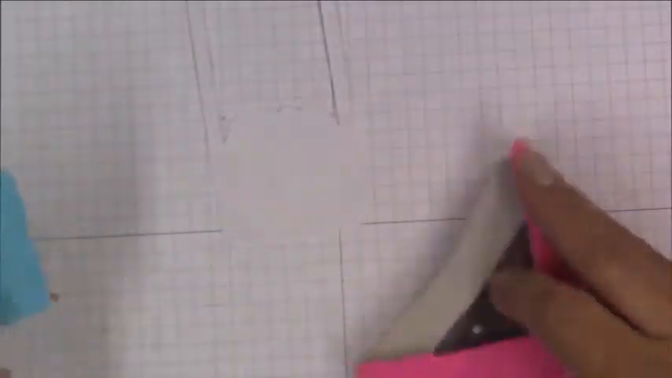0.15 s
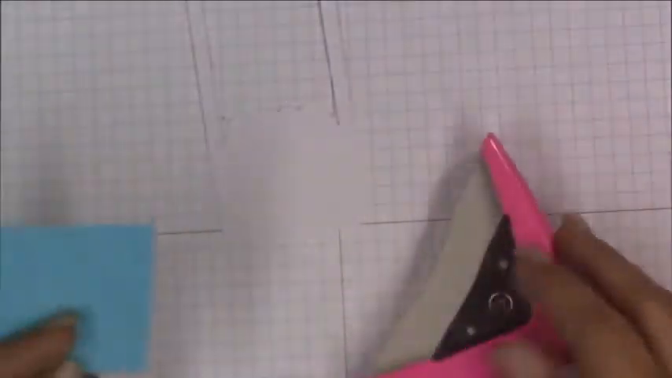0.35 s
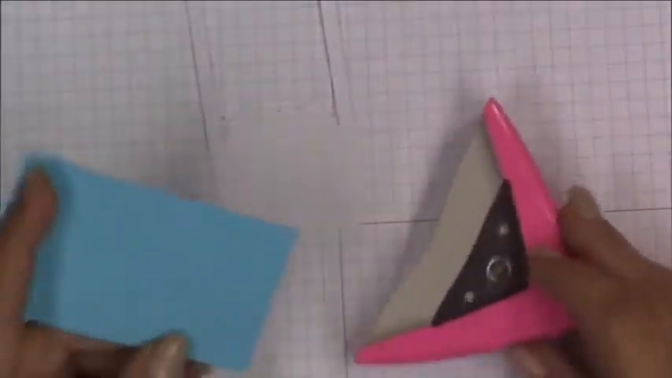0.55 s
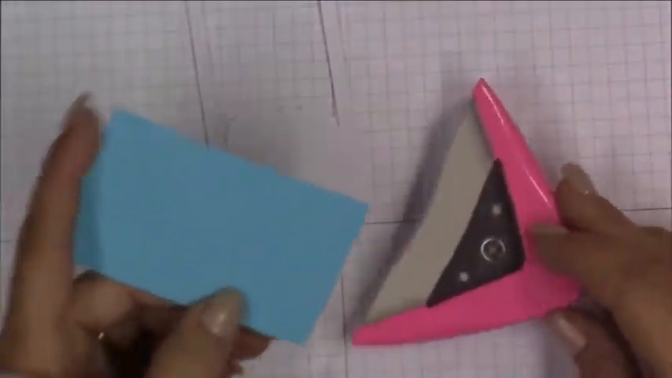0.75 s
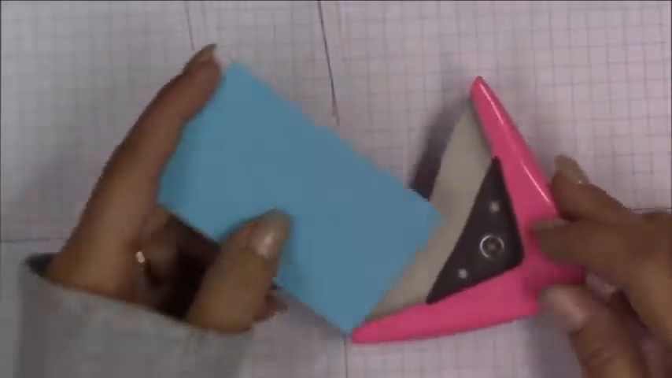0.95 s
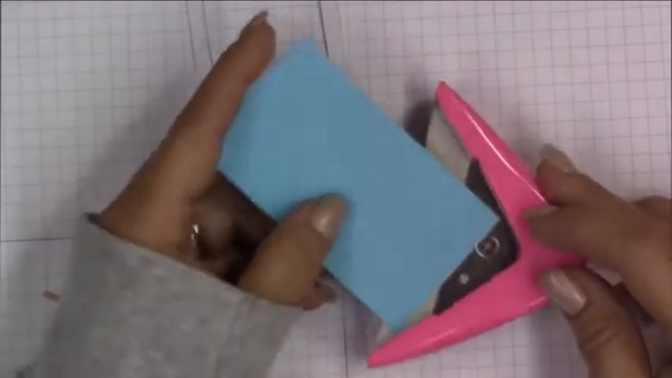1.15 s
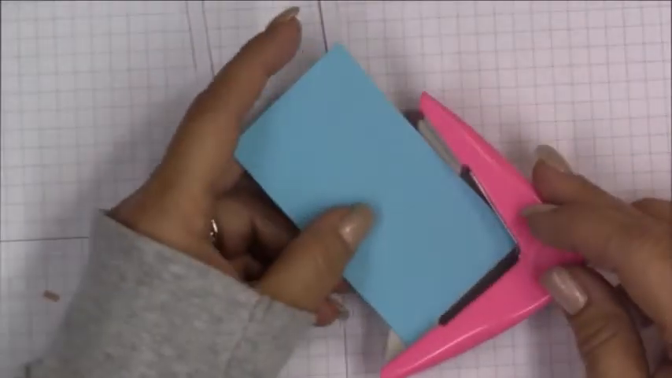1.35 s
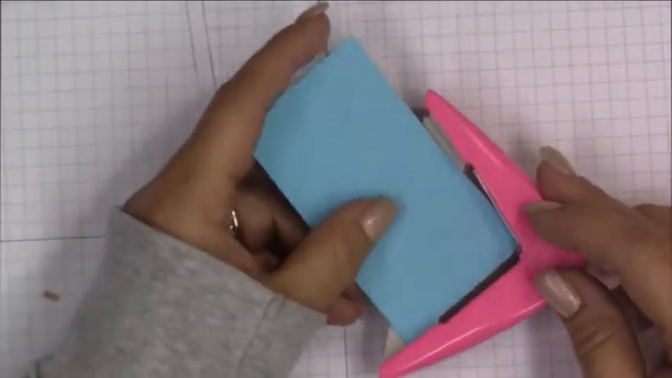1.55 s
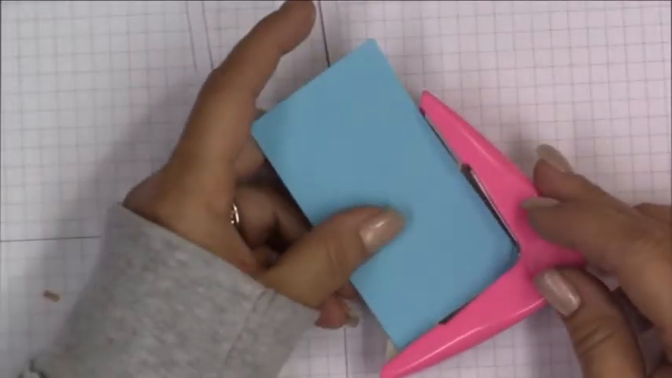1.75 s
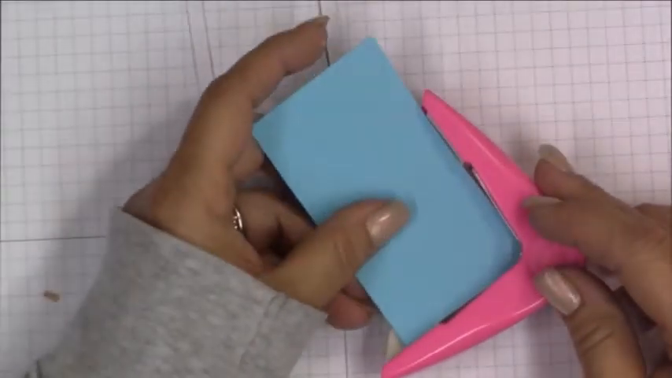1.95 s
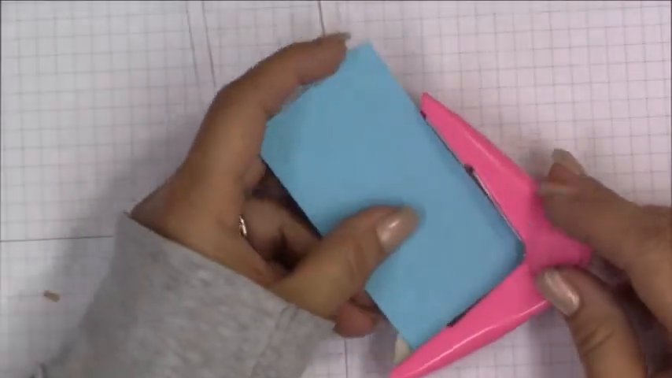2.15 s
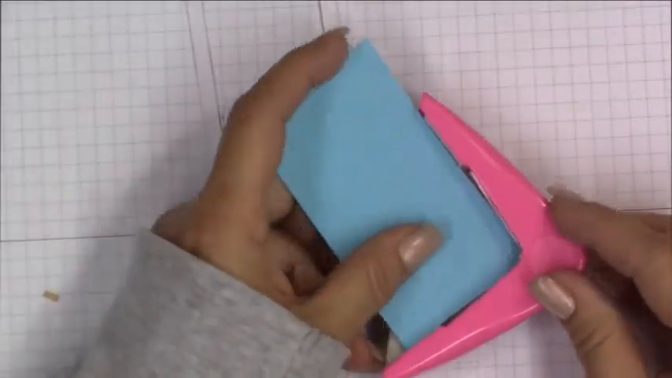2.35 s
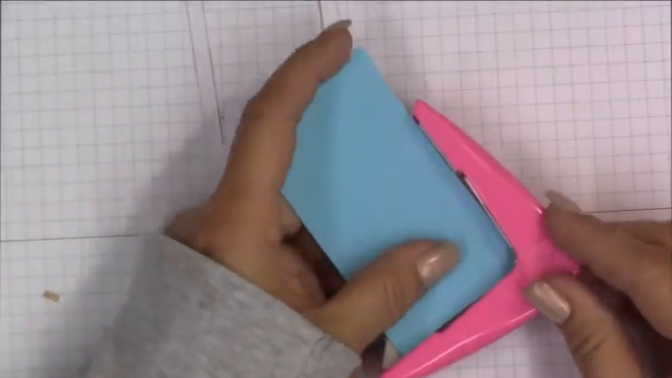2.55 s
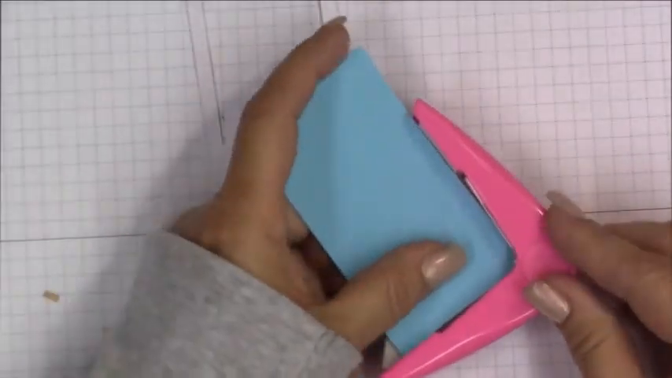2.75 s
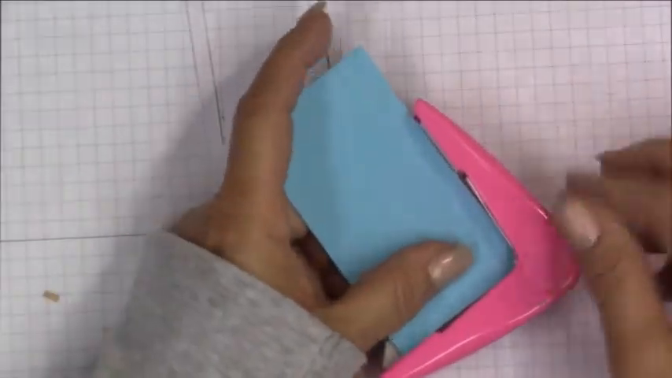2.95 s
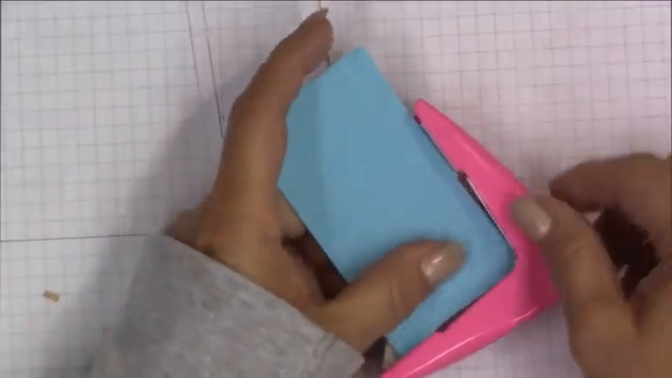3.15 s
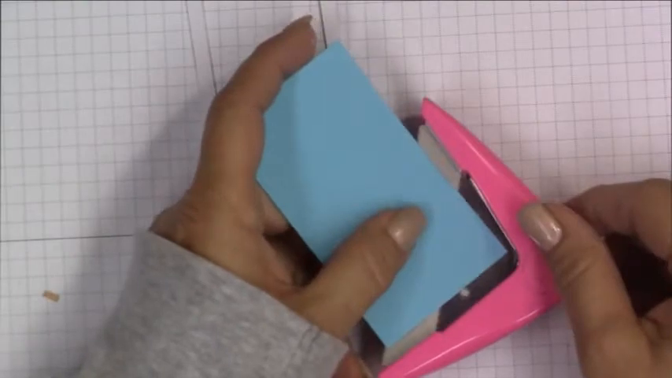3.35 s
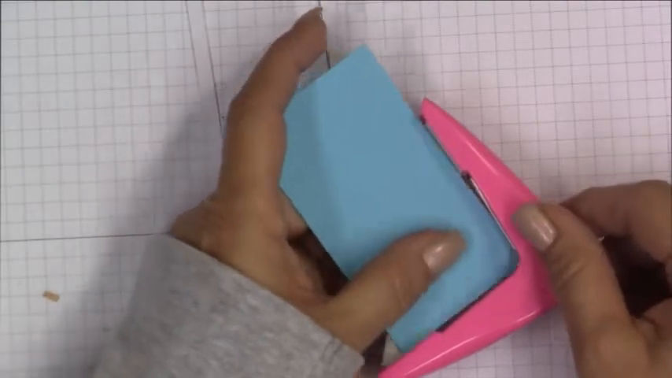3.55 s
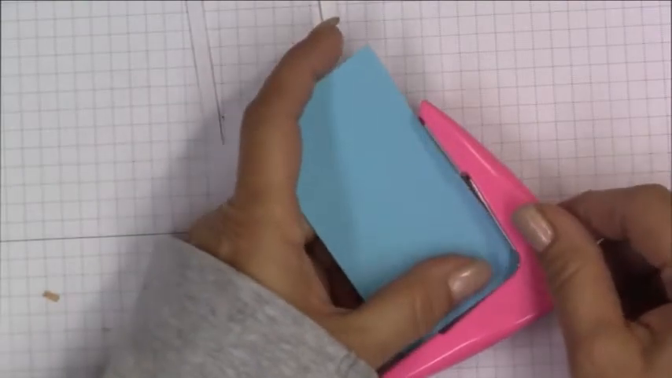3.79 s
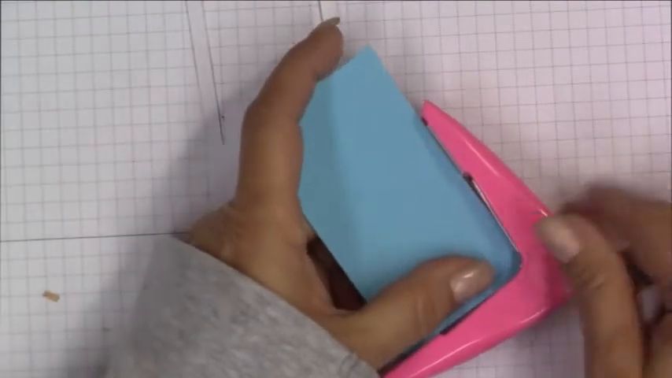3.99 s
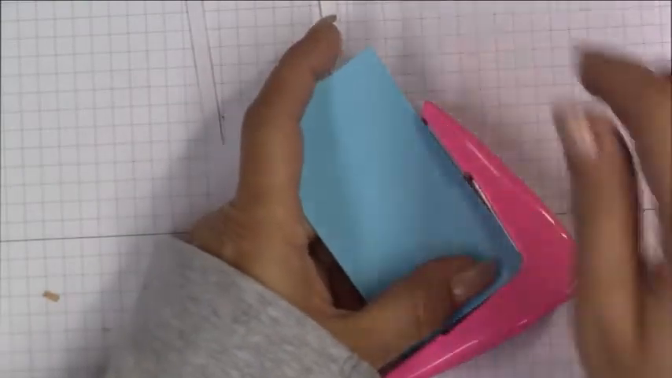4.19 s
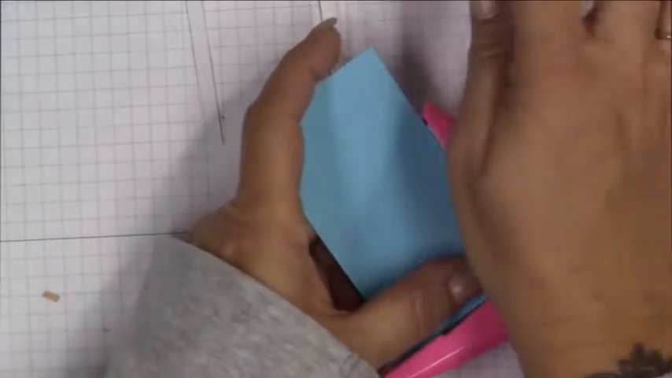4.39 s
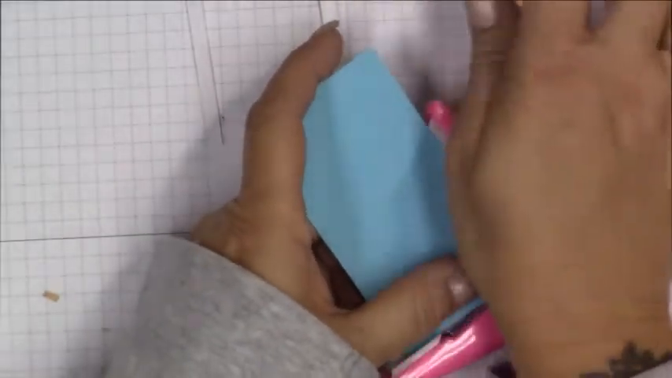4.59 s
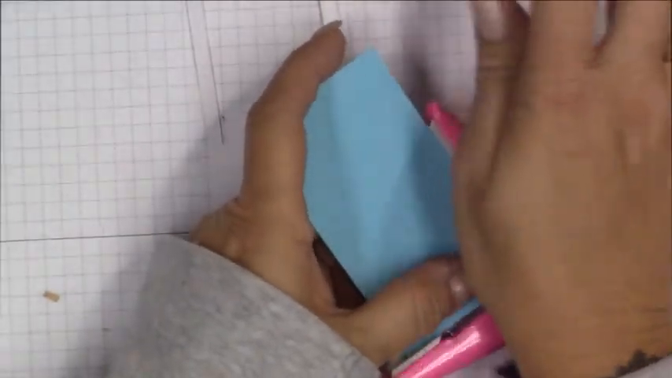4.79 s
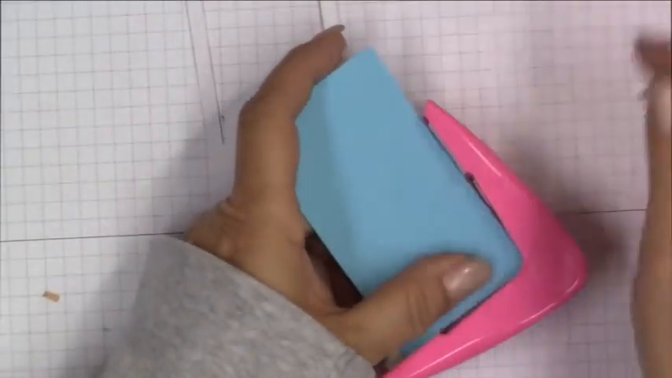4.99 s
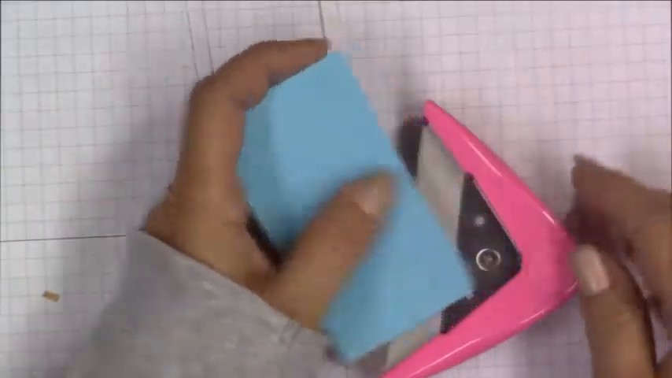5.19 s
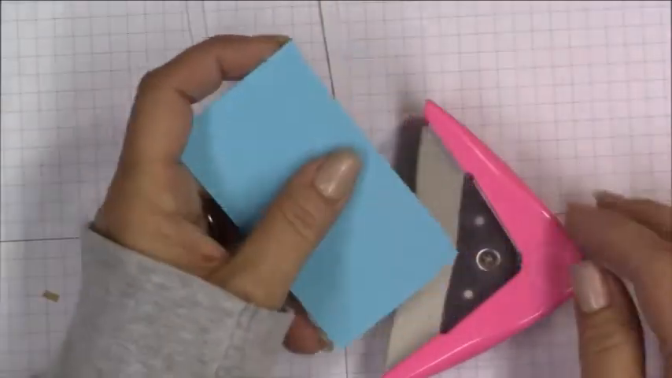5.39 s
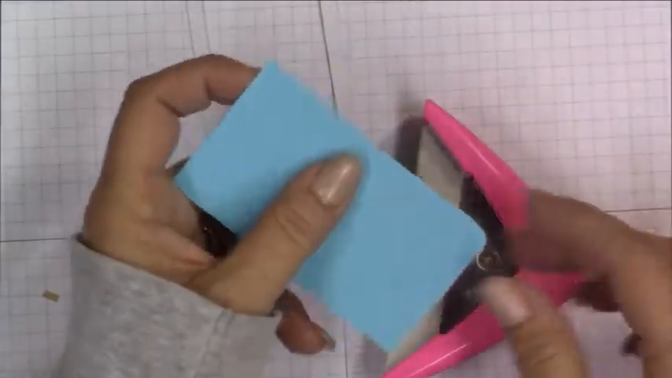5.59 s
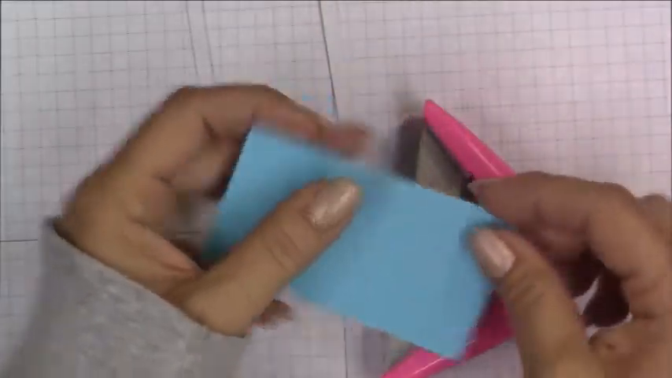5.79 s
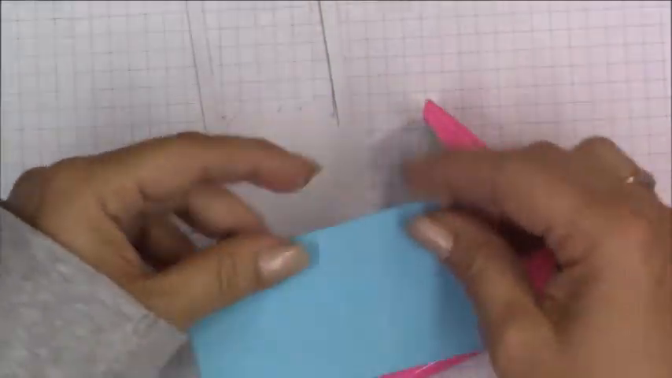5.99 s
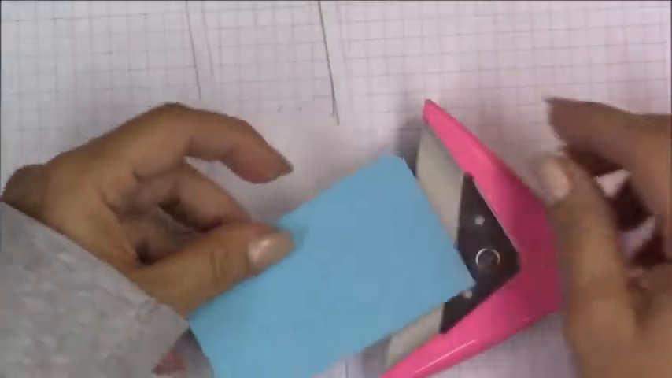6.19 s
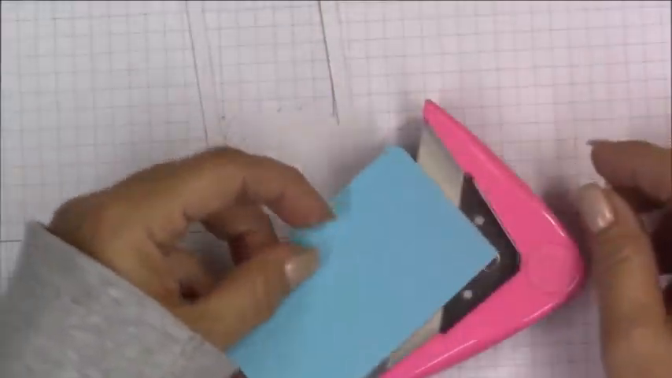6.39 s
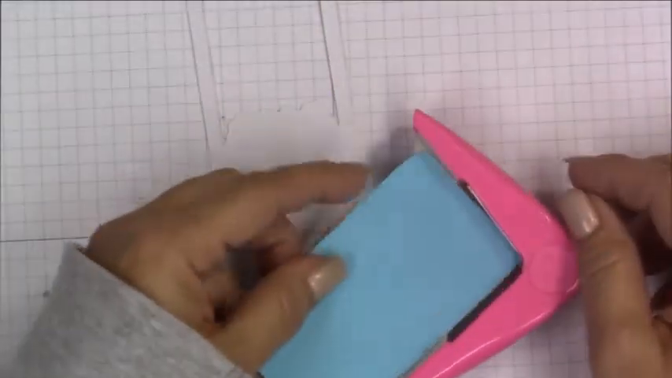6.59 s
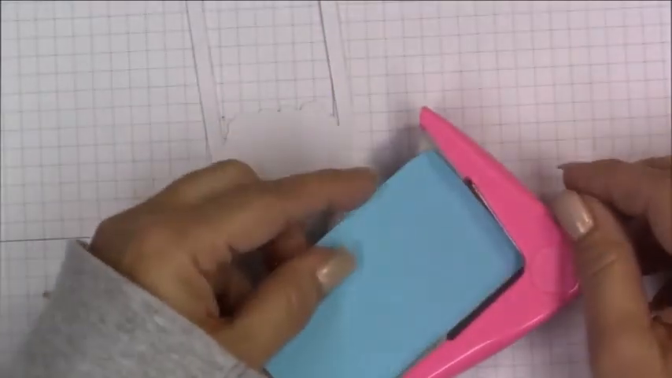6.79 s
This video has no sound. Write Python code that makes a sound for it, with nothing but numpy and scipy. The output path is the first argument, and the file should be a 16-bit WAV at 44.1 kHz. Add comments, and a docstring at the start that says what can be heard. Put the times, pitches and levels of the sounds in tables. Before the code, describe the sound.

A plastic corner punch is set down on a desk with a few light knocks. A piece of card rubs and ticks softly into its guides, and the loose lever gives a small double click. Then the punch snaps through with one loud, crunchy clack and a hollow thump. Two lighter clicks follow as the lever springs back, and the card slides out. The sound is close, in a small quiet room with faint hum.

```python
"""Corner punch on a craft desk

A plastic punch is set down close by in a small room, and a card rubs and ticks into its guides.
A palm presses the lever until the die snaps through with one loud clack: the shell rings, loose
parts chatter, the hollow base booms and knocks on the desk. The lever springs back and the card
is drawn out and turned, over soft room air and mains hum."""
import sys
import numpy as np
from scipy import signal
from scipy.fft import rfft, irfft, next_fast_len
from scipy.io import wavfile
from scipy.ndimage import uniform_filter1d

SR = 44100
rng = np.random.default_rng(int(sys.argv[2]) if len(sys.argv) > 2 else 0)


def unload_audio(sound):
    """Save the sound as a 16-bit wav file, at the path given as the first command line argument."""
    columns = np.transpose(np.atleast_2d(sound))
    # keep every value between -1 and 1, then stretch to whole-number steps
    steps = np.round(np.clip(columns, -1, 1) * 32767)
    wavfile.write(sys.argv[1], SR, steps.astype(np.int16))


N = 301465
T = np.arange(N) / SR


def undb(db):
    """Decibels to gain."""
    return 10 ** (np.asarray(db) / 20)


def unit(x):
    """Scale to rms 1."""
    return x / np.sqrt(np.mean(x ** 2))


def gain_at(hz, curve):
    """Gain of an EQ curve (f/Hz, level/dB), in straight lines on a log axis."""
    f, db = np.transpose(curve)
    return undb(np.interp(np.log(np.maximum(hz, 1)), np.log(f), db))


def eq(x, curve):
    """Filter through an EQ curve."""
    size = next_fast_len(len(x))
    gains = gain_at(np.fft.rfftfreq(size, 1 / SR), curve)
    return irfft(rfft(x, size) * gains, size)[:len(x)]


def noise(n, curve):
    """Noise coloured by an EQ curve; rms 1."""
    return unit(eq(rng.standard_normal(n), curve))


def wander(rate_hz):
    """Smooth random modulation; rms 1."""
    step = int(SR / rate_hz)
    stairs = np.repeat(rng.standard_normal(N // step + 1), step)
    return unit(uniform_filter1d(stairs, step)[:N])


def crackle(per_s):
    """Tiny clicks at random moments, uneven in size; rms 1."""
    return unit((rng.random(N) < per_s / SR) * rng.standard_normal(N))


def fade(t, t60):
    """Decay by 60 dB in t60 seconds."""
    return np.exp(-np.log(1000) * t / t60)


def attack(t, rise_s):
    """S-shaped fade-in."""
    return 1 - np.exp(-(t / rise_s) ** 2)


def ring(modes, gains, t):
    """Struck modes (f/Hz, level/dB, t60/s), each with its own gain."""
    return sum(gain * undb(db) * np.sin(2 * np.pi * hz * t) * fade(t, t60)
               for (hz, db, t60), gain in zip(modes, gains))


def add(out, s, sound):
    """Mix a sound in at s seconds."""
    i = int(s * SR)
    out[i:i + len(sound)] += sound[:N - i]


def stereo(mid, side):
    """Mid and side to left and right."""
    return np.array([mid + side, mid - side])


# Tone of the room air and microphone hiss: f/Hz, level/dB
AIR_TONE = [(15, -12), (30, -9.5), (60, -10), (100, -2.5), (160, -2.5), (260, -1), (400, 0.5), (540, -3.5),
            (1100, -9), (1500, -8), (2300, -15), (7000, -21.5), (11000, -27.5), (15500, -32.5)]
# Stereo width of the air: f/Hz, side re mid/dB
AIR_WIDTH = [(60, -8), (110, -9.5), (200, -7), (700, -5), (1300, -6.5), (2400, -2.5), (4400, -6.5),
             (8000, -12), (15000, -29)]


def room_tone(air_db=-60.5, hum_hz=119.4, hum_db=-68.5):
    """The bed: steady room air with a faint mains hum in the centre."""
    mid, side = noise(N, AIR_TONE), noise(N, AIR_TONE)
    hum = unit(np.sin(2 * np.pi * hum_hz * T + .7 * wander(5)))
    return undb(air_db) * stereo(mid, eq(side, AIR_WIDTH)) + undb(hum_db) * hum


# Tone of the wall reflections: f/Hz, level/dB
WALL_TONE = [(80, -3.5), (200, 2.5), (400, 1.5), (550, 2), (1000, 3), (1500, -0.5), (2700, -4.5),
             (4500, -1), (7000, -4), (15000, 0.5)]
# Stereo width of the reflections: f/Hz, side re mid/dB
WALL_WIDTH = [(40, -5.5), (120, -18), (500, -26), (2300, -18), (4500, -10.5), (8000, -15), (12000, -24.5)]


def room(x, wet_db, early_t60=0.2, late_db=-22, late_t60=0.5):
    """Near walls and shelves answer at once and a weak tail lingers, in a narrow stereo image."""
    t = T[:SR // 2]
    envelope = (fade(t, early_t60) + undb(late_db) * fade(t, late_t60)) * attack(t, 0.0017)
    envelope *= undb(wet_db) / np.linalg.norm(envelope)
    mid, side = (signal.fftconvolve(x, noise(len(t), WALL_TONE) * envelope)[:N] for _ in range(2))
    return stereo(x + mid, eq(side, WALL_WIDTH))


# Envelope of the punch's foot skidding over the mat: t/s, level/dB
SKID_ENVELOPE = [(0, -58), (.09, -61.5), (.15, -64), (.25, -66.5), (.33, -62), (.38, -85)]
# Tone of the skid: f/Hz, level/dB
SKID_TONE = [(60, -26), (200, -5), (800, -3), (1050, -7), (1200, 0), (1400, -11), (4000, -25), (10800, -21),
             (11700, -10), (12500, -24.5), (15000, -37.5)]


def foot_skid():
    """The punch is swung into place: a low scrub with a thin whistling hiss."""
    level_db = np.interp(T, *np.transpose(SKID_ENVELOPE), right=-120)
    return undb(level_db) * noise(N, SKID_TONE)


def card_friction(tone, slip_db, slips_per_s, peaks_db=3.0, shift_hz=9):
    """Brushing fibres and tiny slips, through card resonances that change as the fingers shift."""
    hz = np.geomspace(800, 15000, 70)
    crossfades = np.array([wander(shift_hz) for _ in range(3)])
    crossfades /= np.linalg.norm(crossfades, axis=0)  # constant power
    out = np.zeros(N)
    for crossfade in crossfades:
        resonances = np.column_stack([hz, peaks_db * rng.standard_normal(len(hz))])
        friction = rng.standard_normal(N) + undb(slip_db) * crackle(slips_per_s)
        out += crossfade * eq(friction, resonances)
    return unit(eq(out, tone))


# Fingers shifting the card between strokes: t/s, rub level/dB
TOUCH_ENVELOPE = [(0, -60.5), (.4, -72.5), (.8, -63.5), (1.55, -71), (1.95, -71), (2.65, -65), (3.1, -66.5),
                  (3.7, -78), (3.95, -78.5), (4.9, -75.5), (5.5, -66), (6.8, -70.5)]
# Card strokes over mat, guides and die: fastest moment t/s, rise/s, rub level/dB, hiss level/dB
CARD_STROKES = [(0.215, 0.019, -52.5, -55.5), (0.475, 0.028, -67, -61), (0.6, 0.082, -62, -52.5),
                (0.727, 0.017, -56.5, -59), (0.881, 0.016, -58, -50), (1.05, 0.05, -61, -60.5),
                (1.17, 0.049, -61, -62), (1.44, 0.021, -62.5, -67.5), (1.555, 0.046, -62, -72),
                (1.726, 0.016, -52.5, -60), (1.799, 0.0071, -56, -67), (1.818, 0.025, -54, -71),
                (2.14, 0.0097, -60, -77), (2.27, 0.02, -54.5, -71), (2.348, 0.057, -57, -60.5),
                (3.31, 0.046, -63, -63.5), (3.537, 0.027, -52.5, -60), (3.65, 0.032, -62, -66),
                (3.762, 0.023, -65, -64.5), (3.811, 0.026, -53, -71), (4.02, 0.01, -62, -63.5),
                (4.11, 0.053, -58, -63.5), (4.892, 0.0067, -44.5, -59), (5.295, 0.092, -64, -64.5),
                (5.66, 0.013, -62, -64), (5.81, 0.019, -53, -68), (5.925, 0.089, -64, -61),
                (6.113, 0.011, -61, -57), (6.41, 0.032, -67, -63.5)]
# Body of pressed card rubbing: f/Hz, level/dB
RUB_TONE = [(200, -10.5), (600, -7.5), (1100, -5.5), (1500, 3), (1850, -1.5), (2250, 3.5), (2750, -3),
            (3300, -5.5), (5000, -11), (9000, -24.5), (15000, -41)]
# Airy top of lightly brushed card: f/Hz, level/dB
HISS_TONE = [(1500, -22), (3000, 0), (5000, -2), (7000, -3), (10000, -3), (13000, -12.5), (16000, -19.5)]


def card_slides(trim_db=-1, touch_hiss_db=-5, fidget_db=1.4, grip_db=2.0, stop_share=0.52):
    """Fibres brush and the edge slips in gritty jerks; pressed card has body, a light touch hisses."""
    touch = undb(np.interp(T, *np.transpose(TOUCH_ENVELOPE)) + fidget_db * wander(10))
    rub_power, hiss_power = touch ** 2, (touch * undb(touch_hiss_db)) ** 2
    for s, rise_s, rub_db, hiss_db in CARD_STROKES:
        near = np.abs(T - s) < 3 * rise_s
        t = T[near] - s
        width_s = np.where(t < 0, rise_s, stop_share * rise_s)  # the hand speeds up, then stops sooner
        speed = np.exp(-(t / width_s) ** 2 / 2)
        rub_power[near] += (speed * undb(rub_db)) ** 2
        hiss_power[near] += (speed * undb(hiss_db)) ** 2
    grip = undb(grip_db * wander(90))
    rub = np.sqrt(rub_power) * card_friction(RUB_TONE, slip_db=-1, slips_per_s=1200)
    hiss = np.sqrt(hiss_power) * card_friction(HISS_TONE, slip_db=-3, slips_per_s=900)
    return undb(trim_db) * grip * (rub + hiss)


def edge_catches(per_s=2.6, db=-59, spread_db=5, hz=3200, spread_octaves=1.5, ring_db=-4):
    """Cues for light catches of the card's edge, scattered in time, level and pitch."""
    gaps, levels, pitches = rng.random((64, 3)).T
    times = np.cumsum(-np.log(1 - gaps)) / per_s
    return [(s, db + spread_db * (level - .5), hz * 2 ** (spread_octaves * (pitch - .5)), ring_db)
            for s, level, pitch in zip(times, levels, pitches) if s < T[-1]]


# Small dry ticks and taps: card edge catching, lever clicking, punch base knocking as it settles.
# t/s, level/dB, centre f/Hz, ring re snap/dB
SMALL_TICKS = [(0.074, -53, 5000, -5), (0.1125, -42, 8400, -9), (0.111, -39, 4660, -4),
               (0.333, -49, 3200, -8), (0.485, -43.5, 3500, -10), (0.486, -44, 6500, 3),
               (0.547, -41, 4060, -3), (0.635, -45, 2950, 0), (0.636, -49, 8000, -13),
               (0.871, -44.5, 1490, -2), (0.878, -47.5, 3640, -9), (1.118, -50, 1510, -7),
               (1.143, -46, 2400, 2), (1.7132, -44.5, 1960, -4), (1.7133, -47, 7100, -8),
               (1.739, -49, 1750, 8), (1.925, -48, 4350, -9), (2.435, -40.5, 4770, 4),
               (2.776, -41, 1470, -6), (2.7758, -50, 7500, -6), (2.8378, -40.5, 4900, -10),
               (2.734, -51, 2290, -6), (2.97, -55.5, 2600, -6), (3.854, -50, 1470, -5),
               (4.042, -52, 1400, -7), (4.153, -49.5, 2500, -8), (5.1479, -41, 570, -7),
               (5.1499, -45, 900, -2), (6.116, -57, 3530, -10), (6.6465, -47.5, 2780, -8.5)]


def small_ticks(snap_t60=0.017, ring_t60=0.01):
    """Light, well damped contacts: a short dry snap round one broad resonance, with a brief ping."""
    out, t = np.zeros(N), T[:SR // 10]
    for s, db, hz, ring_db in SMALL_TICKS + edge_catches():
        tone = [(hz / 3, -22), (hz * 0.99, 0), (hz, 0), (hz * 1.7, -14), (hz * 3.5, -28), (hz * 8, -42)]
        snap = noise(len(t), tone) * fade(t, snap_t60)
        ping = ring([(hz, ring_db, ring_t60)], [1], t)
        add(out, s, undb(db) * (snap + ping))
    return out


# The base knocks on the desk: t/s, level/dB, bass tilt/(dB per octave down), second landing/dB
DESK_KNOCKS = [(0.1102, -45, 4.5, 2.5), (0.2366, -41, -5, -3), (0.2745, -50.5, 7.5, -11),
               (1.819, -51.5, 3.5, -14), (2.776, -45, -2, -4), (2.8740, -50.5, 4.5, -11),
               (4.582, -48, 8, 0), (4.6383, -28, 4.5, -5.5), (4.732, -51, 7, 1), (4.884, -45, 6.5, 2),
               (5.1475, -49, -3, -12)]
# Modes of the desk top: f/Hz, level/dB, t60/s
DESK_MODES = [(88.4, -21, 0.08), (134, -16.5, 0.043), (172, -8.5, 0.11), (193, -7.5, 0.15), (285, -8, 0.06),
              (322, 0, 0.07), (368, -3.5, 0.069), (400, -3.5, .06), (445.8, -13, 0.06), (705, -16, 0.019),
              (932, -19, 0.02)]


def desk_knocks(push_s=0.0019, rock_s=.0223, rock_tilt_db=-3.5):
    """The base thuds through the mat into the desk top, rocks and lands again with less bass."""
    out, t = np.zeros(N), T[:SR // 4]
    octaves_down = np.log2(400 / np.array(DESK_MODES)[:, 0])
    cushion = 1 - np.exp(-t / push_s)
    for s, db, tilt_db, second_db in DESK_KNOCKS:
        first = ring(DESK_MODES, undb(tilt_db * octaves_down), t)
        second = ring(DESK_MODES, undb((tilt_db + rock_tilt_db) * octaves_down), t)
        add(out, s, undb(db) * first * cushion)
        add(out, s + rock_s, undb(db + second_db) * second * cushion)
    return out


# The lever is nudged and let go: t/s, level/dB, low modes/dB, high modes/dB
LEVER_CLICKS = [(2.7743, -31.5, -0.5, -31), (2.8374, -33.5, -17, 0)]
# Modes of the lever: f/Hz, level/dB, t60/s
LEVER_MODES = [(900, -4.5, .03), (1480, 0, 0.026), (2190, 1.5, 0.023), (2350, -1.5, 0.017),
               (2680, -13, 0.013), (3960, 2, 0.018), (4660, -6, .016), (6200, -13, 0.011), (8300, -7, .009),
               (10500, -8, 0.0092)]


def lever_clicks(contact_s=0.0004, bounce_s=0.0096, bounce_db=-13):
    """The loose lever taps its hinge and bounces once: dark when nudged, bright when it flicks back."""
    out, t = np.zeros(N), T[:SR // 8]
    for s, db, low_db, high_db in LEVER_CLICKS:
        tone = [(1500, low_db), (2100, 0), (2700, 0), (3900, high_db)]
        gains = gain_at(np.array(LEVER_MODES)[:, 0], tone)
        click = undb(db) * ring(LEVER_MODES, gains, t) * attack(t, contact_s)
        add(out, s, click)
        add(out, s + bounce_s, undb(bounce_db) * click)
    return out


# The base booms as it is set down and as the die goes in and comes out:
# t/s, level/dB, f/Hz, swell/s, hold/s, pitch sag/(Hz per s)
BASE_BOOMS = [(0.108, -34, 294, 0.003, 0.0061, 0), (0.126, -41, 383, .004, 0.015, 3998),
              (0.2345, -36.5, 305, 0.004, 0.0064, 0), (4.645, -22, 415.6, 0.011, .031, 2302),
              (4.898, -33, 409, 0.017, 0.036, 305)]


def base_booms(t60=0.017, tail_db=-21, tail_t60=0.24, roughness=0.2, rough_hz=160):
    """The hollow base swells into a rough low note that can sag as the load goes; a faint tail stays."""
    out, t = np.zeros(N), T[:SR // 4]
    for s, db, hz, swell_s, hold_s, sag_hz_per_s in BASE_BOOMS:
        since_release = np.maximum(t - hold_s, 0)
        pitch = hz - sag_hz_per_s * np.clip(t - swell_s, 0, 2 * hold_s)
        note = fade(since_release, t60) * np.sin(2 * np.pi * np.cumsum(pitch) / SR)
        tail = undb(tail_db) * fade(since_release, tail_t60) * np.sin(2 * np.pi * hz * t)
        add(out, s, undb(db) * attack(t, swell_s) * (note + tail))
    return out * (1 + roughness * wander(rough_hz))


# Tone of the chatter after the snap: f/Hz, level/dB
CRUNCH_TONE = [(300, -19), (560, -14.5), (720, 3.5), (1060, 1.5), (1250, -11), (1750, -10), (2100, -0.5),
               (2650, 5), (3200, 0.5), (4000, -10.5), (4700, -16), (6500, -11), (10000, -24),
               (15000, -35.5)]


def die_crunch(start_s=4.645, db=-23.5, t60=.18, clicks_per_s=1700, rattle_db=2.5, rattle_hz=380):
    """After the snap, die, spring and cut card chatter in a dense, dying burst of clicks."""
    out, t = np.zeros(N), T[:SR // 3]
    clicks = crackle(clicks_per_s) * undb(rattle_db * wander(rattle_hz))
    chatter = unit(eq(clicks, CRUNCH_TONE))[:len(t)]
    envelope = fade(t, t60) * (1 - np.exp(-t / 0.005))
    add(out, start_s, undb(db) * chatter * envelope)
    return out


# Hits in the punch: set down, card seated, slack taken up, die snaps through (the loudest),
# lever bottoms out, die drags back, lever meets its top stop.
# t/s, level/dB, body/dB, die ring/dB, brightness/dB, crack/dB, rebound/dB
PUNCH_HITS = [(0.1116, -56, 11, -10.5, 16, 7.5, -28), (0.2343, -54.5, 12.5, 6.5, -1, 5, -12),
              (0.2583, -56.5, 11, 0, 4, 2, -11), (2.4360, -43, -9, 1.5, -13, -3, -26),
              (4.4820, -50, -12, -8, 0, 4, -19.5), (4.4955, -40, -11, -3, 0, 6.5, -34),
              (4.575, -28.5, 0.5, -6.5, 1, 3, -16.5), (4.5939, -38.5, 2, -3, -3, 4.5, -12),
              (4.6374, -6, 1.5, 1.5, 0, -4.5, -13), (4.6665, -27.5, 5, -2, -13, 1, -23),
              (4.891, -37.5, 8.5, 3, 4, -0.5, -20), (4.9015, -42, 9, -3, -3, 8.5, -6),
              (4.9063, -34, 4, 3, 2, 7, -23.5), (5.1054, -39.5, -10, -0.5, -1, 6, -9),
              (5.1094, -34, -1, 0.5, -6, 6, -29)]


def hits_and_rebounds(first_gap_s=.0032, gap_growth=1.57, fall_db=-7.5):
    """Cues for each hit and four rebounds of loose parts, ever weaker and further apart."""
    for s, db, body_db, die_db, bright_db, crack_db, rebound_db in PUNCH_HITS:
        yield s, db, body_db, die_db, bright_db, crack_db
        for k in range(4):
            s += first_gap_s * gap_growth ** k
            weaker_db = rebound_db + fall_db * np.log2(k + 1)
            # rebounds are thinner and brighter, with more crack
            yield s, db + weaker_db, body_db - 1, die_db, bright_db + 2.5, crack_db + 8.5


# Modes of the plastic shell and steel die: f/Hz, level/dB, t60/s
PUNCH_MODES = [(550, -25, .03), (674, -14.5, 0.035), (732, -12.5, 0.04), (804, -14.5, 0.035),
               (968, -19.5, 0.052), (1062, -14.5, 0.045), (1301, -15.5, .025), (1441, -11, 0.022),
               (1960, -4.5, 0.017), (2085, -8.5, .017), (2220, -2, 0.023), (2427, -1, 0.019),
               (2665, -2, 0.025), (2810, -12.5, 0.027), (3063, -4.5, 0.015), (3168, -4.5, .02),
               (3425, -7.5, 0.01), (3840, -9.5, 0.011)]
# Tone of a contact's crack: f/Hz, level/dB
CRACK_TONE = [(100, -16.5), (520, -5), (750, -1), (1050, -3), (1300, -4.5), (1900, -6.5), (2700, 1.5),
              (3500, 3), (4600, -4.5), (6200, -4), (8200, -6.5), (11000, -14.5), (16000, -29)]


def punch_clacks(crack_t60=0.025, scatter_db=2.5, detune=0.002, tail_db=-23, tail_t60=0.19):
    """Each contact cracks and rings the shell: heavy ones stir its low modes, sharp ones its highs."""
    out, t = np.zeros(N), T[:SR // 4]
    for s, db, body_db, die_db, bright_db, crack_db in hits_and_rebounds():
        tone = [(1000, body_db), (2200, 0), (3100, die_db), (7000, bright_db)]
        modes = np.array(PUNCH_MODES)
        # the grip loads the shell differently each time
        modes[:, 0] *= 1 + detune * rng.standard_normal(len(modes))
        gains = gain_at(modes[:, 0], tone) * undb(scatter_db * rng.standard_normal(len(modes)))
        gains[1::2] *= -1  # neighbouring modes swing in opposite directions
        crack = undb(crack_db) * eq(noise(len(t), CRACK_TONE), tone) * fade(t, crack_t60)
        tail = ring([(hz, mode_db + tail_db, tail_t60) for hz, mode_db, _ in modes], gains, t)
        add(out, s, undb(db) * (ring(modes, gains, t) + tail + crack))
    return out


def scene():
    """Punch, desk and card in the room over the bed; booms and lever clicks sit drier."""
    handling = punch_clacks() + die_crunch() + desk_knocks() + foot_skid() + small_ticks() + card_slides()
    mix = room(handling, wet_db=-6)
    mix += room(base_booms(), wet_db=-13)
    mix += room(lever_clicks(), wet_db=-9)
    return mix + room_tone()


def record(dry, low_cut_hz=60, ceiling=.95, high_cut_hz=15800):
    """Output chain: thin the deep bass, flatten peaks at the ceiling, cut the top."""
    low_cut = signal.butter(2, low_cut_hz, "highpass", fs=SR, output="sos")
    high_cut = signal.ellip(10, .1, 80, high_cut_hz, fs=SR, output="sos")
    flattened = np.clip(signal.sosfilt(low_cut, dry), -ceiling, ceiling)
    return signal.sosfilt(high_cut, flattened)


dry = scene()
out = record(dry)
unload_audio(out)
```